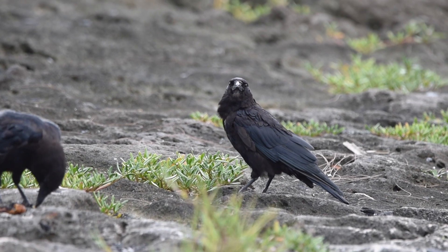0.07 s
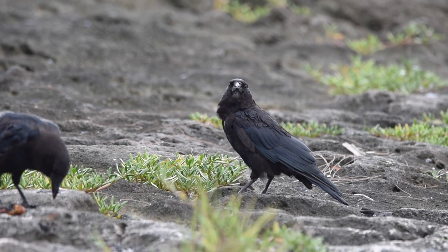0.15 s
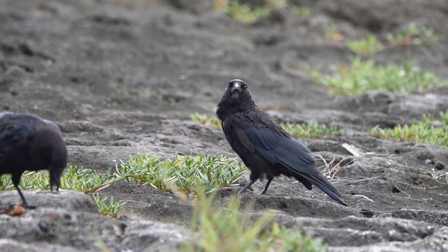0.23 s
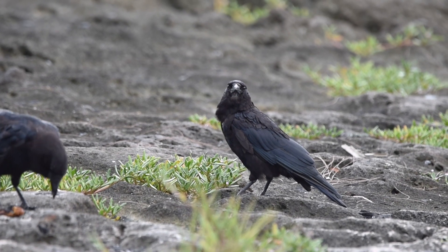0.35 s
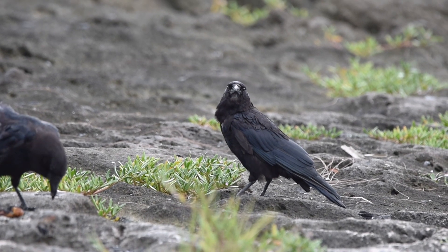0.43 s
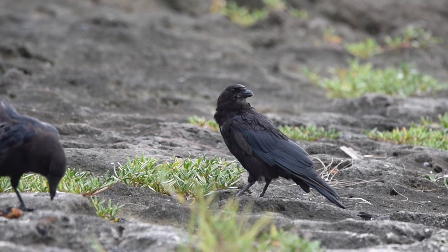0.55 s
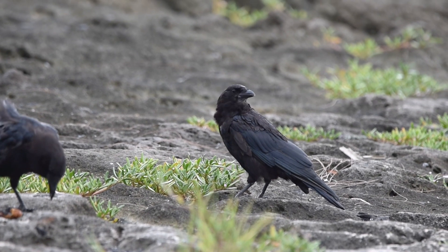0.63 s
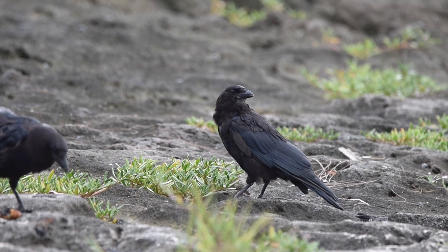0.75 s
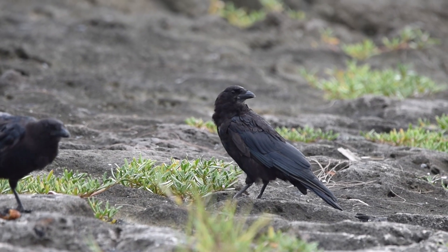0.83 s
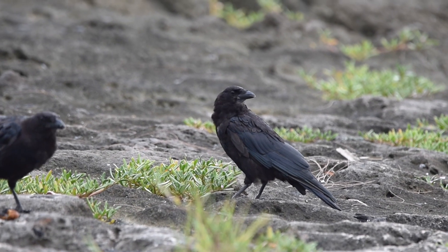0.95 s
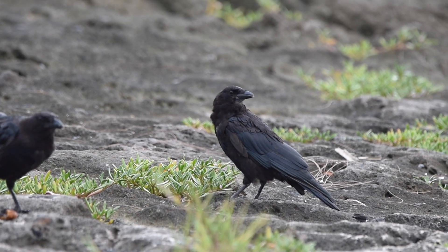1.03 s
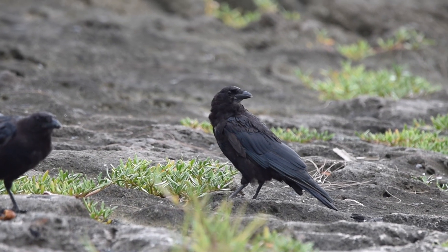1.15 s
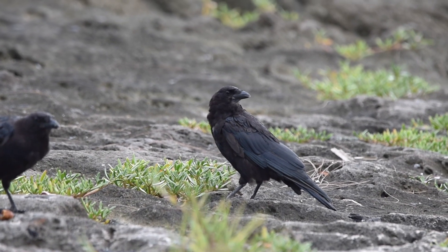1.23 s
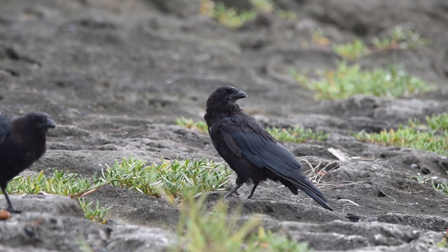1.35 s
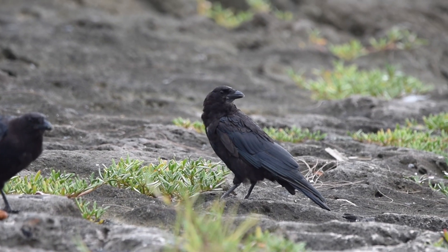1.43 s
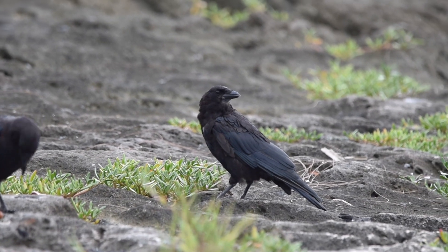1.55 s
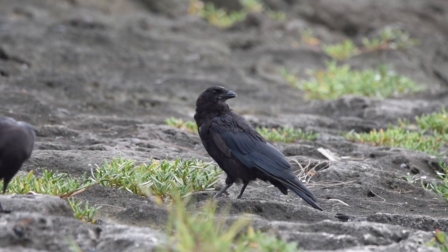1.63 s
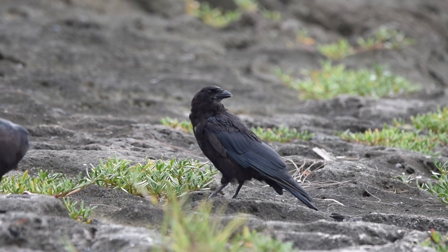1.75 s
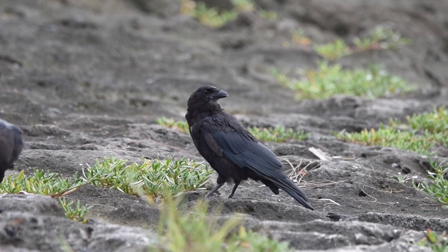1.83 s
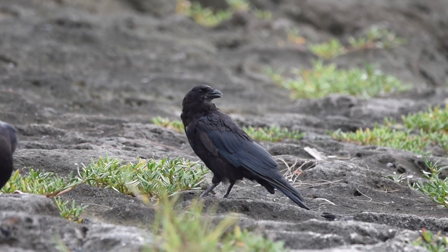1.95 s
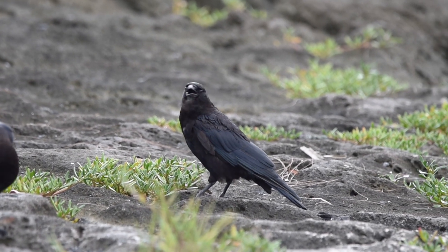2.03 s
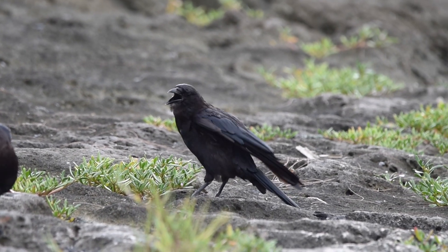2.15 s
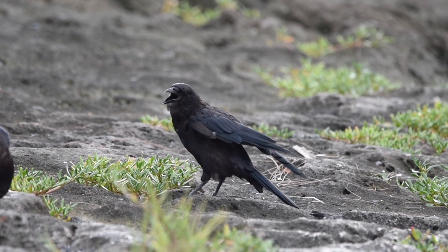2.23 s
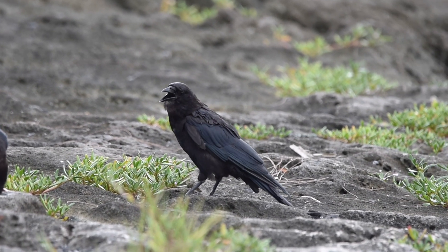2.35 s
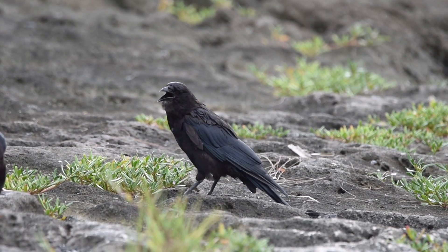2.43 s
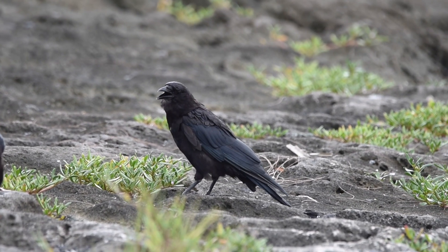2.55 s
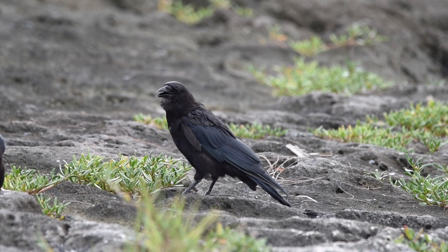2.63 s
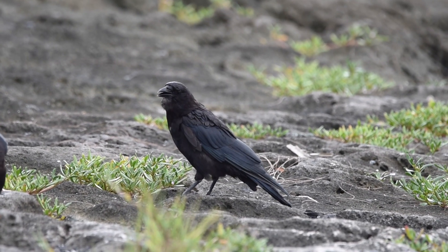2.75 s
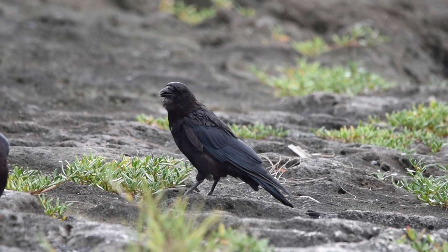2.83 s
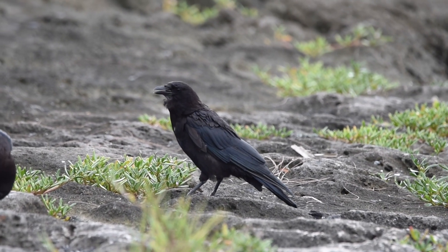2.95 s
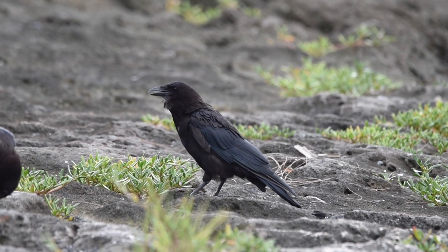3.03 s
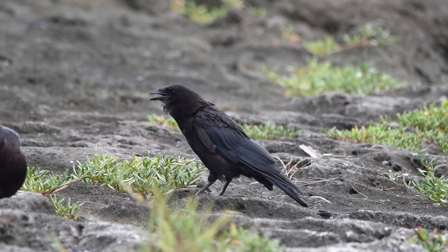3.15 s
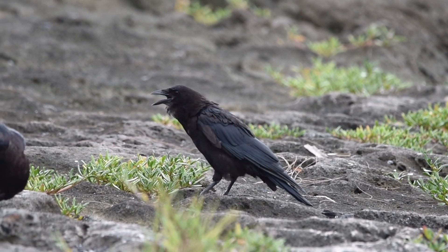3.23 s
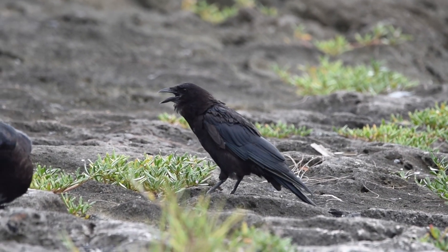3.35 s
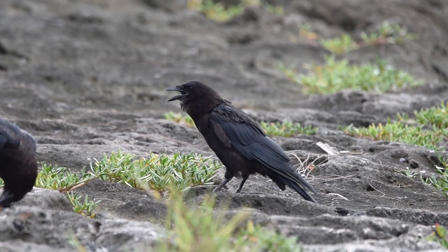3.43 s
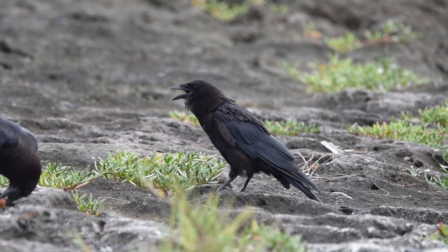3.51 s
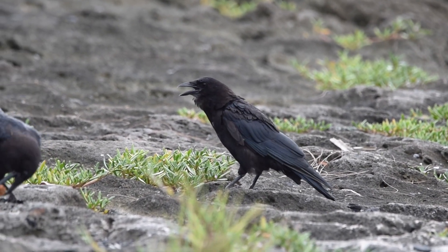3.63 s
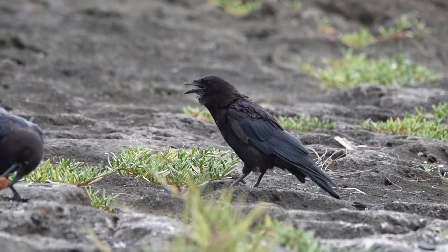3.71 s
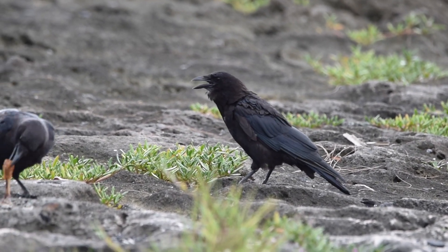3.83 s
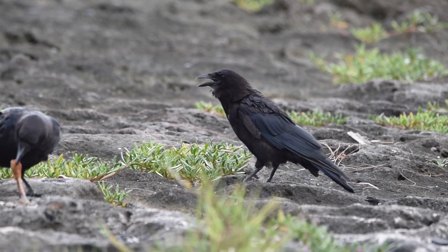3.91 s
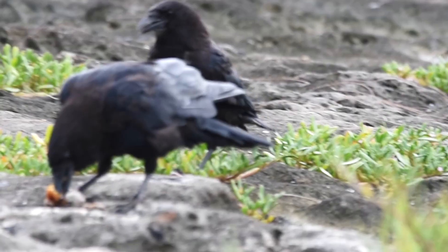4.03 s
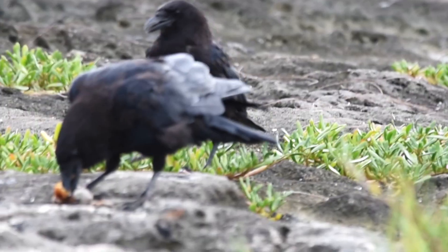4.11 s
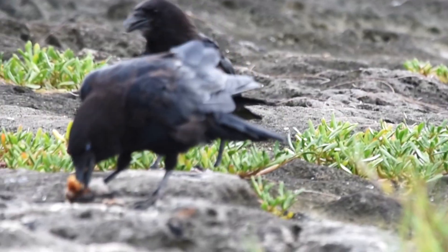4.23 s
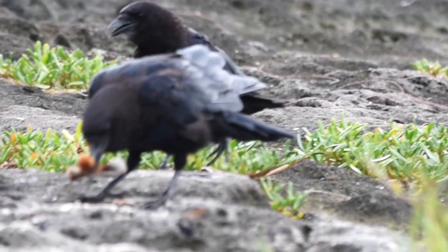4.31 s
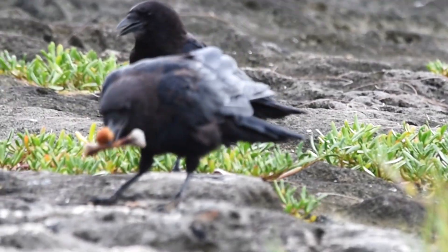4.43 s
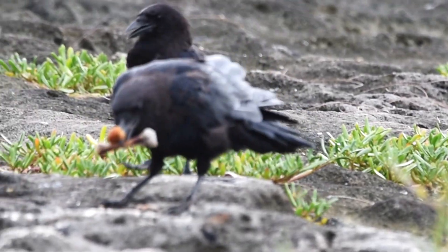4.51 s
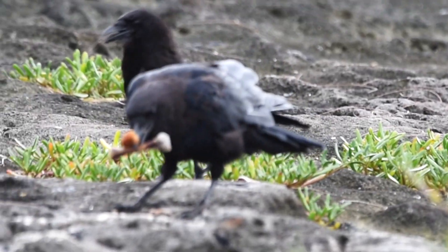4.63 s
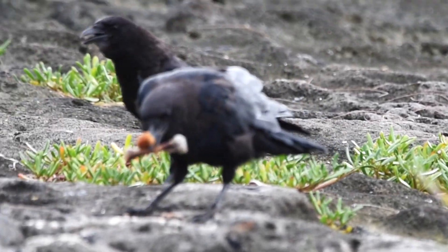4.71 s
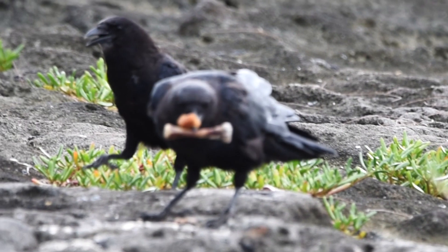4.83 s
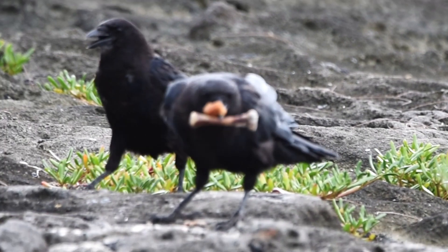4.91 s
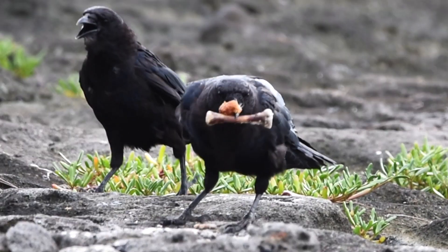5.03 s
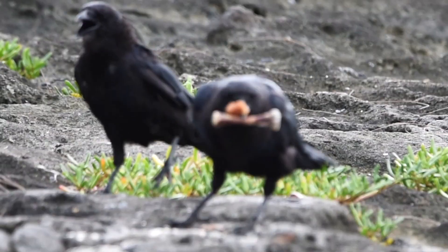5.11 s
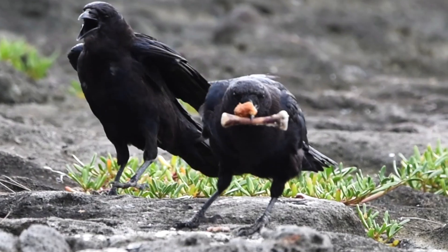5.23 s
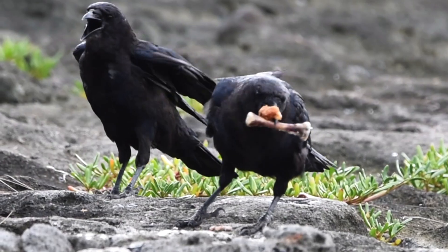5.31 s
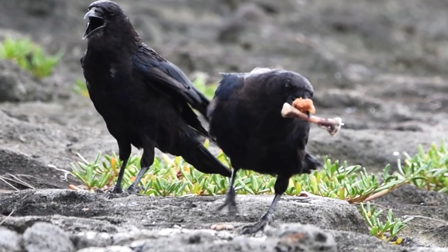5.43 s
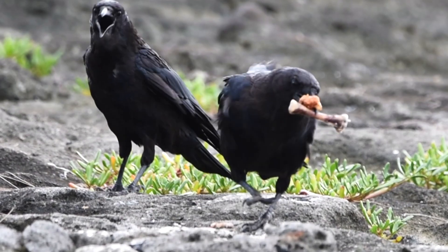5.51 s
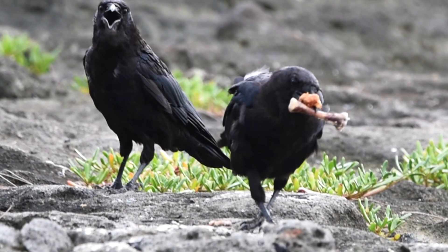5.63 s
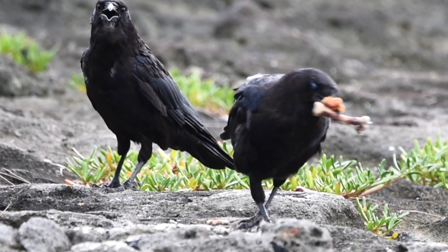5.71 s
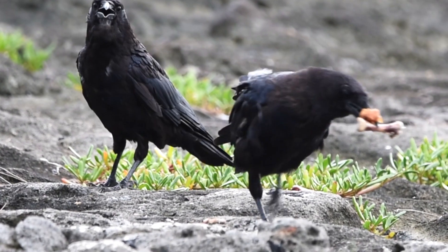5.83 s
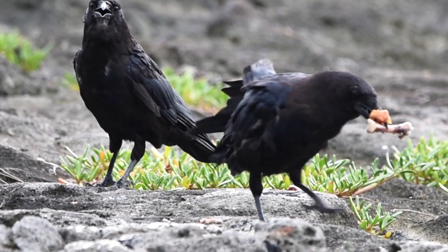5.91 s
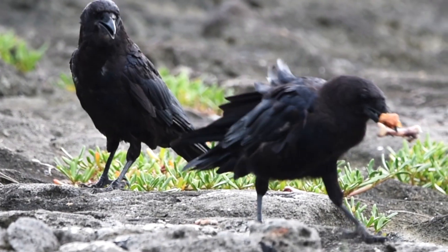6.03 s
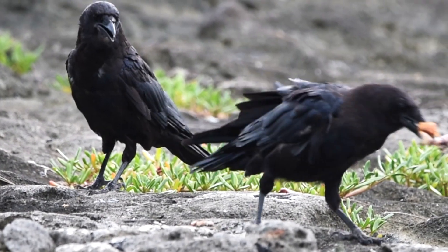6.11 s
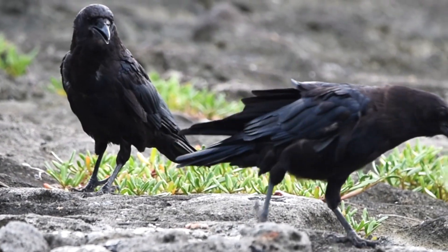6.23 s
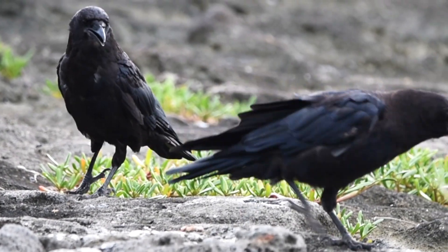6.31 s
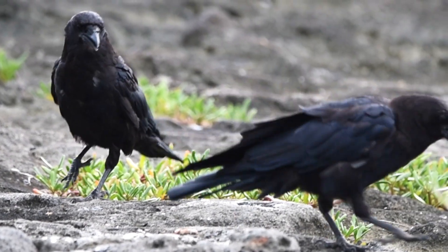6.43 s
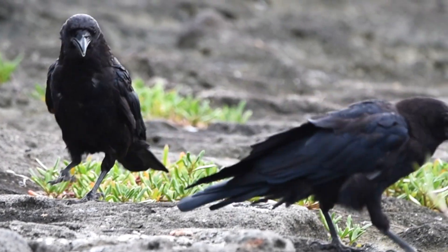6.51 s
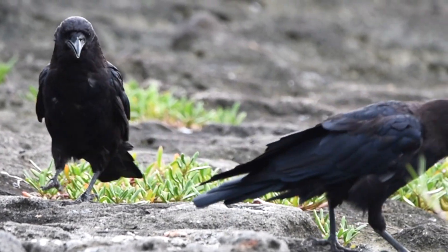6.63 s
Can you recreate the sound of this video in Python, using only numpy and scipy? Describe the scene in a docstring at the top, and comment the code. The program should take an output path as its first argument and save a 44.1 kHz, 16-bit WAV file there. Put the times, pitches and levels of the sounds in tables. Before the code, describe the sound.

Two falling crow caws over a distant humming wash with sharp stony pecks, a sudden dropout, then bony knocks, a longer third caw and sparrow chirps.

```python
"""A distant wash with humming bands and soft gurgles, then beaks pecking at stone with a ringing body.
Crows on open rocky ground near a camera give two falling caws, and bumps sound on the camera body.
The wash cuts out; gusty air fades in with bright grit, knocks like bone, a third caw and a sparrow's chirps.
Caws are fluttering harmonics through resonances, hits are ringing modes or grit, chirps are gliding
whistles, and the backgrounds are shaped noise; rocks scatter echoes of the near sounds and the caws."""
import sys
import numpy as np
from scipy import signal
from scipy.fft import rfft, irfft
from scipy.io import wavfile
from scipy.ndimage import uniform_filter1d

SR = 44100
rng = np.random.default_rng(int(sys.argv[2]) if len(sys.argv) > 2 else 0)


def wav_record(signal):
    """Record a signal, one row per channel, as 16-bit PCM in the file named by sys.argv[1]."""
    frames = np.transpose(np.atleast_2d(signal))
    bounded = np.clip(frames, -1, 1)
    # unit amplitude maps onto the largest positive 16-bit level
    quanta = np.round(bounded * 32767).astype(np.int16)
    wavfile.write(sys.argv[1], SR, quanta)


N = 293706
CUT_S = 4.034  # the distant wash has stopped by here

# resonances that colour the pecks and the bright grit, as of stone: f/Hz, width/Hz, level/dB
STONE_MODES = [(534, 130, 14.5), (840, 170, 10), (2340, 230, 2), (3600, 110, -4), (4700, 180, -18.5),
               (5430, 200, -11), (6870, 630, -24.5), (9510, 970, -24.5), (10400, 710, -30)]


def gain_of(db):
    """Decibels to amplitude."""
    return 10 ** (np.asarray(db) / 20)


def evened(x):
    """Scales to rms 1."""
    return x / np.sqrt(np.mean(abs(x) ** 2) + 1e-20)


def read(points, hz):
    """Reads a spectrum on a log-frequency axis."""
    f, value = np.transpose(points)
    return np.interp(np.log(hz + 1), np.log(f + 1), value)


def add(mix, s, sound, pan_db):
    """Places a sound at a time and a side (left minus right dB), keeping its level in the middle."""
    part = mix[:, round(s * SR):][:, :len(sound)]
    sides = gain_of([[pan_db / 2], [-pan_db / 2]])
    part += sides / sides.mean() * sound[:part.shape[1]]


def through(modes, hz):
    """Gain of a set of resonances at the frequencies hz."""
    return np.sqrt(sum(gain_of(db) ** 2 / (1 + (2 * (hz - f) / w) ** 2) for f, w, db in modes))


def resonate(x, hz, width):
    """A resonance of gain 1: shifts hz down to zero, smooths, and shifts back."""
    turn = np.exp(2j * np.pi * np.cumsum(hz * np.ones(len(x))) / SR)
    r = np.exp(-np.pi * width / SR)
    return 2 * (turn * signal.lfilter([1 - r], [1, -r], x / turn + 1e-18)).real


def wander(size, hz):
    """Smooth chance of rms 1, changing about hz times a second."""
    span = max(int(SR / hz), 1)
    return evened(uniform_filter1d(uniform_filter1d(rng.standard_normal(size), span), span))


def wash(colour, same, pan, patchy_db, lumpy_db):
    """Stereo noise from random short-time spectra, with drifting patches and wide lumps; middle at rms 1."""
    frames, hz = N // 128 + 5, np.fft.rfftfreq(512, 1 / SR)
    a, b, c, d, patches = rng.standard_normal((frames, 257, 5)).T
    patches = evened(uniform_filter1d(uniform_filter1d(patches, 5, 0), 12, 1))
    lumps = evened(uniform_filter1d(rng.standard_normal(frames), 6))
    like = np.clip(read(same, hz), -1, 1)[:, None]
    left = a + 1j * b
    right = like * left + np.sqrt(1 - like ** 2) * (c + 1j * d)
    z = np.array([left, right])
    z *= gain_of(read(colour, hz)[:, None] + patchy_db * patches + lumpy_db * lumps)
    z *= gain_of(np.array([[.5], [-.5]]) * read(pan, hz))[:, :, None]
    out = signal.istft(z, nperseg=512, noverlap=384)[1][:, :N]
    return out / np.std(out.mean(0))


def gurgles(count):
    """Short rounded blobs of blurred tone: a few clear ones, and count fainter ones at random."""
    # the clear low gurgles in the distance: t/s, f/Hz, level/dB
    clear = [(.14, 714, -59), (.155, 265, -59), (.21, 864, -63), (.33, 265, -62), (.635, 480, -58),
             (.75, 500, -65), (.745, 264, -57), (.83, 1370, -58), (1.0, 592, -56.5), (1.08, 264.5, -54.5),
             (1.315, 616, -60), (1.49, 407, -55), (1.915, 1050, -59)]
    low_hz, high_hz = 351.8, 1298  # pitch range of the random ones
    out, t = np.zeros((2, N)), np.arange(0, 0.045, 1 / SR)
    at, high, size = rng.random((count, 3)).T
    faint = zip(at * CUT_S, low_hz * (high_hz / low_hz) ** high, -65.5 + 9.7 * (size - .5))
    for s, hz, db in [*clear, *faint]:
        blur = 1 + .4 * (wander(len(t), 120) + 1j * wander(len(t), 120))
        tone = (blur * np.exp(2j * np.pi * hz * t)).real
        add(out, s, gain_of(db) * np.hanning(len(t)) * tone, pan_db=-8.0)
    return out


def yard():
    """Distant wash and gurgles with a few narrow noise bands humming and throbbing."""
    # relative colour of the distant wash: f/Hz, level/dB per Hz
    colour = [(24, -91), (40, -57.5), (123, -41.5), (260, -5), (417, -6.5), (797, -2), (949, -8),
              (1220, -0.5), (1490, -14), (1680, -9), (2270, -14), (2990, -18.5), (3840, -25), (13300, -54),
              (15500, -66)]
    # how alike the two sides are: f/Hz, likeness
    same = [(60, 0.58), (180, 1), (550, 0.87), (1650, 1), (4970, 0.65), (15000, 0.2)]
    # side it leans to: f/Hz, left minus right/dB
    pan = [(60, 11), (180, -12), (550, -6), (1650, -7), (4970, -4.5), (15000, 1.5)]
    # wavering bands, before the side gains: f/Hz, width/Hz, level/dB, throb/dB
    bands = [(264.7, 12, -69.5, 3.5), (1135, 40, -76, 7), (1242, 25, -73.5, 3.5), (1397, 33, -77.5, 5),
             (1660, 7.4, -72, 0.5), (1998, 18, -77.5, 3)]
    hum = np.zeros(N)
    for f, width, db, throb_db in bands:
        band = evened(resonate(rng.standard_normal(N), f, width))
        hum += gain_of(db + throb_db * wander(N, 30)) * band
    far = gain_of(-59) * wash(colour, same, pan, patchy_db=2.5, lumpy_db=0.5)
    return far + hum * gain_of([[-4], [2.5]]) + gurgles(count=50)


def peck(db, t60, tilt_db, body_db):
    """A gritty burst through the stone's resonances: a short rise, a fast decay, a fainter trickle."""
    t, hz = np.arange(6000) / SR, np.fft.rfftfreq(6000, 1 / SR)
    tilt = tilt_db * np.log2(np.maximum(hz, 1500) / 4000)
    colour = gain_of(tilt + body_db / (1 + (hz / 1100) ** 4)) * through(STONE_MODES, hz)
    colour *= hz ** 2 / (hz ** 2 + 350 ** 2) / (1 + (hz / 12000) ** 6)
    rise = np.sin(np.pi / 2 * np.minimum(t / .008, 1)) ** 2
    envelope = (gain_of(-60 * t / t60) + gain_of(-22 - 20 * t / t60)) * rise
    uneven = gain_of(3.5 * wander(len(hz), 3000))  # random ripple across the spectrum
    grit = evened(rng.standard_normal(6000) * gain_of(1.9 * wander(6000, 510)))
    grit = irfft(rfft(grit) * evened(colour) * uneven)
    return gain_of(db - 5.0) * envelope * grit


def pecks():
    """Beak and claw striking stone, each hit with its own brightness and body."""
    # t/s, level/dB before peck()'s trim, t60/s of the fast decay, left minus right/dB,
    # brightness/dB per octave, body/dB below about 1100 Hz
    hits = [(1.162, -33, 0.055, -8, 6, 3), (1.5161, -38, 0.075, -10, 6, 1), (2.016, -63, 0.14, -11, 4, -3),
            (4.6072, -55.5, 0.35, -12, 0.1, 0), (4.958, -47, 0.1, -15, 0.5, -3),
            (5.0297, -51.5, 0.2, -17, 2, 0), (5.176, -47, 0.089, -21, 0.1, 0),
            (5.832, -41, 0.039, -24, 1.5, 0), (5.571, -33, 0.035, -20, 6, -8)]
    out = np.zeros((2, N))
    for s, db, t60, pan_db, *tone in hits:
        add(out, s, peck(db, t60, *tone), pan_db)
    return out


def ring(db, hz, t60, rattle, rise_s):
    """A quick or slow rise into one decaying mode; rattle blurs it with noise."""
    t = np.arange(6000) / SR
    blur = evened(resonate(resonate(rng.standard_normal(len(t)), hz, 0.31 * hz), hz, 0.31 * hz))
    rise = np.sin(np.pi / 2 * np.minimum(t / rise_s, 1)) ** 2
    return gain_of(db - 60 * t / t60) * rise * (np.sin(2 * np.pi * hz * t) + rattle * blur)


def knocks():
    """Knocks like bone on rock, and the ringing body of the first two pecks: each hit rings five modes."""
    # t/s, level/dB before the mode levels, f/Hz, left minus right/dB
    hits = [(1.168, -48, 2400, -3), (1.169, -44, 880, -8), (1.173, -40, 560, -8), (1.521, -47, 620, -8),
            (1.523, -52, 2100, -8), (1.272, -50, 686, -4), (4.731, -52, 563, -9), (4.756, -46, 700, -9),
            (4.823, -46, 577, -15), (4.959, -37.5, 2050, -5), (4.96, -47, 3200, -5),
            (4.9675, -35, 860, -16), (4.985, -42, 700, -16), (5.004, -41, 930, -21),
            (5.0305, -37, 830, -17), (5.045, -45, 1000, -17), (5.07, -47, 800, -17), (5.095, -47, 950, -17),
            (5.1425, -39, 720, -17), (5.155, -46, 620, -17), (5.177, -36, 800, -13),
            (5.178, -41, 1500, -13), (5.19, -40, 900, -13), (5.2055, -40, 850, -13),
            (5.2255, -38, 1000, -20), (5.255, -33, 821, -11), (5.917, -49, 800, -9),
            (6.013, -53, 2456, -12), (6.017, -56, 2900, -12), (6.318, -51, 640, -15)]
    # modes: multiple of pitch, level/dB, t60 in cycles of the pitch
    modes = [(.7, -8, 60), (1.001, -4, 70), (1.27, -7, 60), (1.75, -12, 36), (2.6, -22, 20)]
    out = np.zeros((2, N))
    for s, db, hz, pan_db in hits:
        knock = sum(ring(db + d, m * hz, cycles / hz, rattle=.7, rise_s=.0012) for m, d, cycles in modes)
        add(out, s, knock, pan_db)
    return out


def rocks(x):
    """Scattered echoes off the rocks: sparse taps of random sign, partly alike on both sides."""
    taps = np.zeros((2, 12000))
    at = np.arange(200, 11960, 20) + rng.integers(0, 20, (2, 588))
    np.put_along_axis(taps, at, rng.choice([-1., 1.], at.shape), 1)
    taps += 0.64 * taps[::-1]
    taps *= gain_of(-60 * np.arange(12000) / SR / 0.22)  # t60 0.22 s
    return signal.fftconvolve(x, taps / np.linalg.norm(taps[0]), axes=1)[:, :N]


def breath(size, colour):
    """Noise of the rms of a unit sine, coloured by a function of frequency."""
    noise = irfft(rfft(rng.standard_normal(size)) * colour(np.fft.rfftfreq(size, 1 / SR)), size)
    return evened(noise) / np.sqrt(2)


def caw(rows, resonances, slope_start_db, slope_end_db, third_under_db, third_top_db, pipe_hz,
        rough_start, rough_end, late_flutter, sharp):
    """A harmonic voice with almost no fundamental; throat flutter shakes pitch and strength."""
    # moments where the voice catches: t/s, depth/dB on the 2nd harmonic (half on the 3rd), width/s
    catches = [(2.259, 9, 0.0028), (2.28, 10, 0.0014), (2.317, 8, .003), (2.334, 4, 0.0025),
               (2.402, 14, 0.021), (2.471, 9, 0.024), (2.499, 5, 0.011), (3.324, 9, 0.0021),
               (3.34, 7.5, 0.0094), (3.36, 18, 0.0034), (3.379, 5.5, 0.003), (3.429, 8.5, 0.0023),
               (5.433, 5, 0.0031), (5.451, 2, 0.0023), (5.472, 4, .005), (5.496, 4.5, 0.0068),
               (5.523, 5, 0.0027), (5.541, 2, 0.0027), (5.563, 4, 0.003), (5.577, 8, 0.0035),
               (5.599, 8, .004), (5.617, 13, 0.0037), (5.652, 2, .003)]
    s, *columns = np.transpose(rows)
    t = np.arange(s[0], s[-1], 1 / SR)
    hz, second_db, pipe_db, upper_db, rasp = (np.interp(t, s, c) for c in columns)
    rasp = np.clip(rasp, 0, 1)
    done = (t - s[0]) / (s[-1] - s[0])  # share of the caw gone by
    slope_db = slope_start_db + (slope_end_db - slope_start_db) * done
    # the 3rd harmonic draws level with the 2nd, up to its own ceiling
    third_db = np.minimum(second_db - third_under_db * np.maximum(1 - done / 0.72, 0), third_top_db)
    flutter = np.clip(np.interp(done, [0.31, 0.31 + 0.11], [0.14, late_flutter]), 0, 1)
    rough = np.clip(rough_start + (rough_end - rough_start) * done, 0, 1)
    flutter_hz = 55.05 * (1 + 0.11 * wander(len(t), 30))
    beat = np.sin(2 * np.pi * np.cumsum(flutter_hz) / SR)
    shaken_hz = hz * (1 + 0.037 * flutter * beat + 0.008 * rough * wander(len(t), 570))
    turns = np.cumsum(shaken_hz) / SR

    k = np.arange(1, 25)[:, None]  # harmonic numbers
    # breath noise smears the harmonics, the high ones most
    swell_db = np.array([2.0 * wander(len(t), 25) + 2.5 * wander(len(t), 70) for _ in k])
    smear = np.array([wander(len(t), 820) + 1j * wander(len(t), 900) for _ in k])
    high_blur = .16 + .1 * np.maximum(k - 13, 0) + rasp * (.12 + .025 * k)
    blur = np.where(k > 6, high_blur, .05 + .3 * rough)
    waves = np.exp(2j * np.pi * (k * turns + rng.random(k.shape)))
    tones = ((1 + blur * smear) / np.sqrt(1 + 2 * blur ** 2) * waves).real
    catch_db = sum(-db * np.exp(-((t - at) / width) ** 2) for at, db, width in catches)

    second = gain_of(second_db + catch_db + 3.0) * (1 + .3 * flutter * beat)
    second *= 1 + 0.6 * rough * wander(len(t), 230)
    out = second * ((1 + 1.36 * rough ** 2 * smear[1]) * np.exp(4j * np.pi * turns)).real
    third = tones[2] + 1.53 * rough * (smear[0] * np.exp(6j * np.pi * turns)).real
    # the fundamental and the 4th follow the 3rd faintly
    low = third + gain_of(-17.5) * tones[0] + gain_of(-16.0) * tones[3]
    out += gain_of(third_db + catch_db / 2 + 3.0 * rough * wander(len(t), 70)) * low

    windpipe = [(pipe_hz, 347, 0)]  # f/Hz, width/Hz, level/dB

    def octaves_up(f):
        return np.log2(np.maximum(f / 7500, 1))

    def throat_colour(f):
        return through(resonances, f) ** sharp * (f > 3900) * gain_of(slope_db.mean() * octaves_up(f))

    pipe = through(windpipe, k[4:6] * hz) ** 3
    throat = through(resonances, k[6:] * hz) ** sharp
    throat *= gain_of(swell_db[6:] + slope_db * octaves_up(k[6:] * hz))
    pipe_rasp = breath(len(t), lambda f: through(windpipe, f) ** 2)
    throat_rasp = breath(len(t), throat_colour)
    air_share = rasp ** 3  # share of the power that is breath ringing the resonances
    upper = np.zeros(len(t))
    for db, shape, part, noise in [(pipe_db, pipe, tones[4:6], pipe_rasp),
                                   (upper_db, throat, tones[6:], throat_rasp)]:
        voiced = (shape * part).sum(0) / np.linalg.norm(shape, axis=0)
        upper += gain_of(db) * (np.sqrt(1 - air_share) * voiced + np.sqrt(air_share) * noise)
    out += np.sqrt(2) * (1 - .5 * flutter * beat) * upper  # dips as the 2nd harmonic swells
    return out * signal.windows.tukey(len(t), .06)


def caws():
    """Three crow calls: the direct voices, and the share of each thrown at the rocks."""
    # one table a caw, levels before caw()'s trims: t/s, f/Hz, level/dB of the 2nd harmonic,
    # level/dB of the windpipe ring, level/dB of the upper harmonics, rasp on these upper parts 0-1
    calls = [
        [(2.185, 561, -67, -63, -64, .6), (2.215, 642.6, -52.5, -65.5, -52.5, 0.1),
         (2.265, 654.5, -30, -53, -51.5, .2), (2.308, 644.5, -30.5, -67, -51.5, 0.3),
         (2.318, 624.4, -35.5, -71, -51, 0.4), (2.35, 608, -37, -64, -51, .2),
         (2.385, 591, -37.5, -57.5, -50.5, 0.3), (2.435, 577.3, -39, -56, -54, 0.4),
         (2.465, 564, -42.5, -45.5, -54, 0.1), (2.495, 548, -48, -53.5, -56, 0.55),
         (2.512, 535, -49.5, -68, -60, 0.7), (2.535, 519, -52, -70, -68, 0.88),
         (2.575, 505.4, -56.5, -67, -76, 1), (2.62, 494, -67, -78, -86, 1)],
        [(3.285, 591, -57, -79, -75.5, 1), (3.302, 628.5, -54, -76, -69.5, .9),
         (3.312, 631.4, -33.5, -78, -69, .8), (3.345, 635.3, -33.5, -75, -65.5, .6),
         (3.368, 625, -30.5, -73, -69.5, .6), (3.385, 619, -35, -70, -73, .6),
         (3.402, 605.3, -31, -66, -66, 0.5), (3.415, 591.4, -31, -63, -57.5, .35),
         (3.47, 570, -37.5, -54, -54, 0.25), (3.5, 561, -38.5, -58.5, -55.5, 0.6),
         (3.535, 548, -42.5, -72, -59, 0.8), (3.575, 527.7, -48.5, -80, -72.5, 1),
         (3.63, 489.7, -63.5, -67, -75.5, 0.93), (3.69, 462, -68, -73, -77, 1)],
        [(5.215, 563, -60, -70, -70, .7), (5.231, 589, -42, -71, -62, .6), (5.245, 631, -34, -66, -56.5, .3),
         (5.271, 666.8, -29, -62, -58.5, .2), (5.339, 659.2, -30, -50.5, -52.5, 0.36),
         (5.38, 649.4, -28, -53.5, -50.5, .2), (5.41, 641.6, -29, -60.5, -51.5, .2),
         (5.449, 617, -32.5, -50, -47.5, 0.35), (5.523, 603.6, -35, -43, -50.5, 0.23),
         (5.58, 590, -38.5, -46, -54.5, .4), (5.63, 571.5, -42, -48.5, -59.5, .4),
         (5.655, 551, -48, -50, -65, .4), (5.67, 525, -50, -66, -72, .5), (5.69, 494.4, -52, -78, -85, .6)],
    ]
    # resonances of the throat and open beak, before sharpening: f/Hz, width/Hz, level/dB in each caw
    throat = [(4300, 600, -2, -3.5, -3.5), (5020, 280, 2.5, 1.5, 7), (5814, 240, 6.5, 5.5, 4.5),
              (6940, 300, 1.5, -0.5, 0), (7900, 800, -4, -15.5, -19), (9300, 1400, -14, -23.5, -23),
              (12050, 3840, -31.5, -36.5, -20.5)]
    # one row a caw: left minus right/dB, slope of the top treble at first and at the end/dB per octave,
    # 3rd harmonic under the 2nd at first/dB, its ceiling/dB, windpipe f/Hz, roughness at first and
    # at the end 0-1, late flutter 0-1, sharpness of the throat resonances (power), echo/dB
    places = [(-6, -1.5, -17.5, 37.5, -48.5, 3350, 0.086, 0.68, 0.37, 1.4, -10.5),
              (-7, -18.5, -24, 56.5, -52, 3330, 0.14, 0.38, 0.48, 1.7, -14),
              (-9.5, -10, -3, 21.5, -44.5, 3500, 0.071, 0.17, 0.4, 0.92, -12.5)]
    crows, thrown = np.zeros((2, 2, N))
    for i, (rows, (pan_db, *voice, echo_db)) in enumerate(zip(calls, places)):
        resonances = [(hz, width, dbs[i]) for hz, width, *dbs in throat]
        call = caw(rows, resonances, *voice)
        add(crows, rows[0][0], call, pan_db)
        add(thrown, rows[0][0], gain_of(echo_db) * call, pan_db)
    return crows, thrown


def bumps():
    """Soft bumps on the camera body, and at the end a very faint low hum: a mode and a fifth above it."""
    # the last row is the slow-rising hum: t/s, level/dB before rattle, f/Hz, t60/s, rise/s,
    # left minus right/dB
    rows = [(2.238, -44.5, 243, 0.15, .014, -11), (2.272, -37, 237, 0.12, .013, -12),
            (2.335, -46, 261, 0.12, .012, -11), (3.8385, -30, 266, 0.031, .005, 9.5),
            (3.843, -44, 140, 0.054, .007, -18), (3.851, -42, 370, 0.041, .004, 9),
            (3.868, -48.5, 230, .047, .005, -3.5), (3.876, -42, 135.6, .065, .006, -20),
            (3.894, -43.5, 180.8, 0.061, .006, -21), (4.215, -84.5, 240, 0.27, .045, -11.5)]
    out = np.zeros((2, N))
    for s, db, hz, t60, rise_s, pan_db in rows:
        low = ring(db, hz, t60, 0.5, rise_s)
        fifth = ring(db - 13.5, 1.5 * hz, 0.7 * t60, 0.97, rise_s)
        add(out, s, low + fifth, pan_db)
    return out


def fade_in():
    """Silence at first, a near-silent stretch, then a steady climb in dB to full level."""
    t = np.arange(N) / SR
    full_s, climb_db_per_s, quiet_db = 4.478, 173.5, -32.5
    return gain_of(np.clip((t - full_s) * climb_db_per_s, quiet_db, 0)) * (t > CUT_S + .122)


def bright_grit():
    """Clumps of tiny grains, louder around the knocks and third caw, coloured by the stone's resonances."""
    # bouts of bright grit, partly the caw's breathy treble, before the side gains: t/s, hold/s, level/dB
    bouts = [(4.58, 0.0083, -77), (4.952, 0.14, -68), (5.13, .1, -70.5), (5.3, 0.25, -72),
             (5.841, .01, -84)]
    t = np.arange(N) / SR
    rise_db_per_s, fall_db_per_s, floor_db = 120, 120, -89
    bouts_db = [db - np.maximum(rise_db_per_s * (s - t), 0) - np.maximum(fall_db_per_s * (t - s - hold), 0)
                for s, hold, db in bouts]
    clumps = np.clip(.6 + wander(N, 14), .05, None)
    grains = (rng.random((2, N)) < 600 * clumps / SR) * rng.standard_normal((2, N))
    grains *= gain_of(1.9 * rng.exponential(1, (2, N)))
    hz = np.fft.rfftfreq(N, 1 / SR)
    colour = hz ** 2 / (hz ** 2 + 400 ** 2) * through(STONE_MODES, hz)
    colour *= gain_of(3.5 * np.log2(np.maximum(hz, 300) / 4000))
    spread = np.exp(1j * np.pi * (hz / 1500) ** 2)  # smears each grain in time
    grit = irfft(rfft(grains + 0.82 * grains[::-1]) * colour * spread, N)
    level_db = np.maximum(np.max(bouts_db, axis=0), floor_db)
    return evened(grit) * gain_of([[-5], [4]] + level_db)


def chirp(rows):
    """A quick gliding whistle, blurred by noise where the voice turns burry."""
    s, *columns = np.transpose(rows)
    t = np.arange(s[0], s[-1], 1 / SR)
    hz, db, burr = (np.interp(t, s, c) for c in columns)
    blur = 1 - np.clip(burr, 0, 1) + burr * (wander(len(t), 900) + 1j * wander(len(t), 900))
    whistle = (blur * np.exp(2j * np.pi * np.cumsum(hz) / SR)).real
    return gain_of(db) * whistle * signal.windows.tukey(len(t), .2)


def chirps():
    """A sparrow's arched chirps and short falling peeps."""
    # t/s, top f/Hz, level/dB before the shape, extra fade/dB per s
    calls = [(4.268, 4190, -61.5, 198), (6.064, 4034, -44, 5)]
    # an arch and a smaller burry one: t/s after start, multiple of pitch, level/dB, burr 0-1
    arch = [(0, .82, -7, 0), (.008, .96, -6, 0.23), (0.025, 1, -2, 0.15), (0.039, .92, -4, 0.3),
            (0.045, .73, -4.5, 0.78), (0.054, .82, -3, .45), (.067, .73, -9, 0.8), (.085, .62, -30, 0.9)]
    # short falling notes: t/s, f/Hz at the start, level/dB
    peeps = [(4.433, 4300, -75), (4.923, 3600, -59.5), (6.058, 5520, -68)]
    peep_s, fall, burr = 0.011, 0.037, 0.26  # length, share of the pitch lost, burr 0-1
    out = np.zeros((2, N))
    for s, hz, db, fade_db in calls:
        rows = [(at, m * hz, db + d - fade_db * at, arch_burr) for at, m, d, arch_burr in arch]
        add(out, s, chirp(rows), pan_db=-11.5)
    for s, hz, db in peeps:
        add(out, s, chirp([(0, hz, db, burr), (peep_s, hz * (1 - fall), db, burr)]), pan_db=-22)
    return out


def air():
    """Wind lumps at the microphones and a hiss that swells with the third caw, partly its breath and echo."""
    # relative colour of the gusts: f/Hz, level/dB per Hz
    gust_colour = [(24, -79), (40, -30.5), (200, -38.5), (360, -10.5), (565, -1), (637, -3), (901, -6.5),
                   (1460, -18), (1650, -13.5), (2500, -17), (3250, -77.5), (5500, -120)]
    # relative colour of the hiss: f/Hz, level/dB per Hz
    hiss_colour = [(710, -35), (1200, 10), (1470, -14.5), (1600, 2), (2310, -3), (2860, -11.5),
                   (3610, -1.5), (4430, -2), (4930, -11), (5430, -9.5), (6510, -15.5), (8700, -35),
                   (12000, -46), (14400, -37.5), (15500, -44)]
    # levels before the fade-in: t/s, gust level/dB, hiss level/dB
    levels = [(4.44, -70.5, -80), (4.64, -62, -66), (4.8, -56, -64.5), (4.93, -52.5, -60.5),
              (5.1, -58, -55), (5.28, -52.5, -54), (5.48, -49.5, -50), (5.65, -51, -49.5),
              (5.81, -57.5, -63.5), (5.99, -58, -71), (6.15, -60.5, -78), (6.66, -68.5, -78)]
    # how alike the two sides are: f/Hz, likeness
    same = [(60, 0.41), (180, 0.97), (550, 0.98), (1650, 0.28), (4970, 0.59), (15000, 0.1)]
    # side it leans to: f/Hz, left minus right/dB
    pan = [(60, 20), (180, -24), (550, -13.5), (1650, -9), (4970, -5), (15000, -21.5)]
    s, gust_db, hiss_db = np.transpose(levels)
    t = np.arange(N) / SR
    gusts = wash(gust_colour, same, pan, patchy_db=-2.0, lumpy_db=1.0)
    hiss = wash(hiss_colour, same, pan, patchy_db=3.0, lumpy_db=-0.2)
    return gusts * gain_of(np.interp(t, s, gust_db)) + hiss * gain_of(np.interp(t, s, hiss_db))


def scene():
    """Birds and hits with their echoes; the distant yard stops at the cut, then air and grit fade in."""
    near = pecks() + knocks() + chirps()
    # small things carry no bass
    near = signal.sosfilt(signal.butter(2, 300, "high", fs=SR, output="sos"), near)
    crows, thrown = caws()
    echoes = rocks(gain_of(-14.5) * near + thrown)
    before = np.clip((CUT_S - np.arange(N) / SR) / 0.008, 0, 1)  # closes over 8 ms
    return near + crows + echoes + bumps() + before * yard() + fade_in() * (air() + bright_grit())


def record(dry):
    """The microphone's bass cut, then a steep treble limit."""
    thin = signal.sosfilt(signal.butter(2, 95, "high", fs=SR, output="sos"), dry)
    treble_limit = signal.firwin(511, 15550, window=("kaiser", 9), fs=SR)
    return signal.oaconvolve(thin, treble_limit[None], "same")


dry = scene()
out = record(dry)
wav_record(out)
```